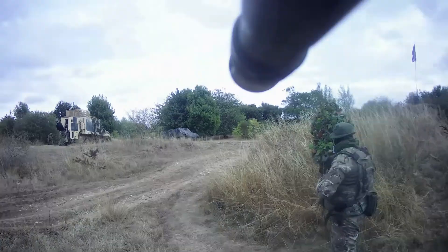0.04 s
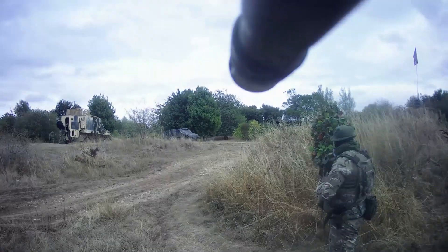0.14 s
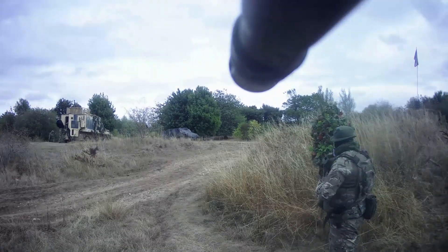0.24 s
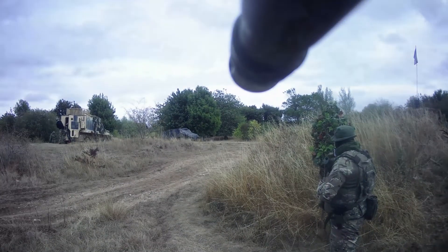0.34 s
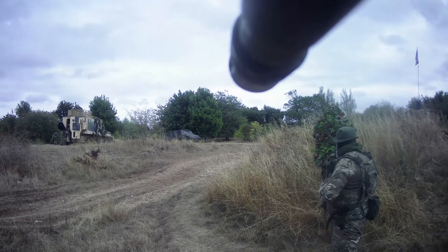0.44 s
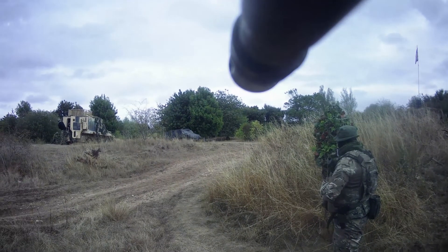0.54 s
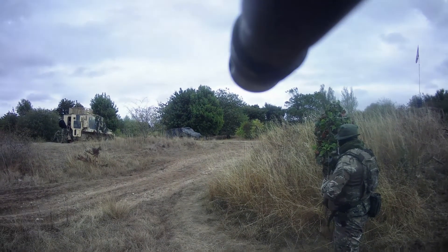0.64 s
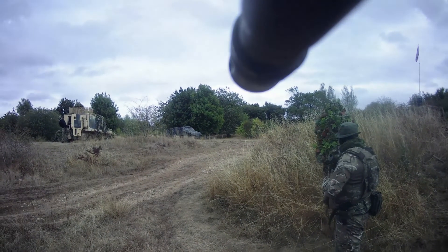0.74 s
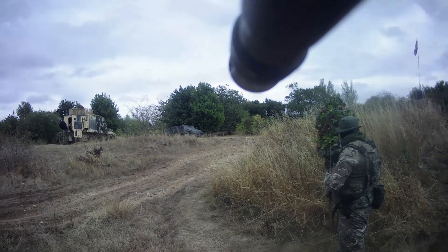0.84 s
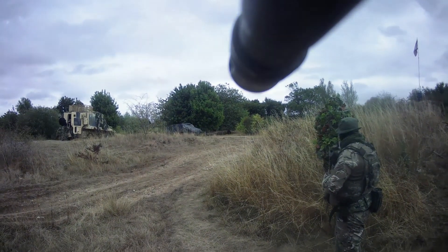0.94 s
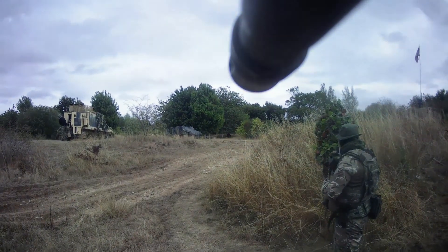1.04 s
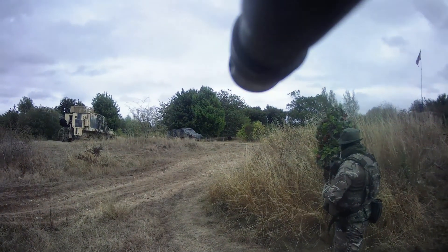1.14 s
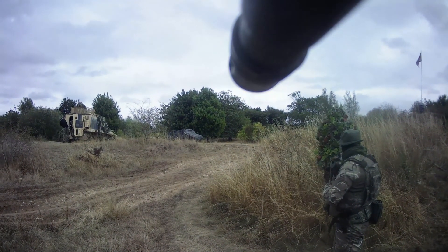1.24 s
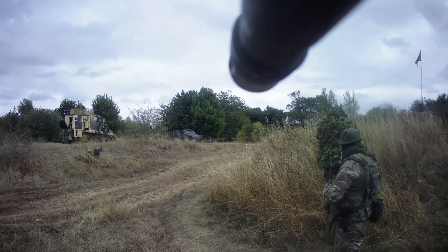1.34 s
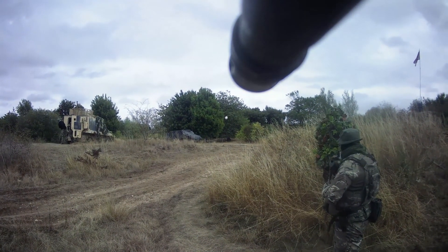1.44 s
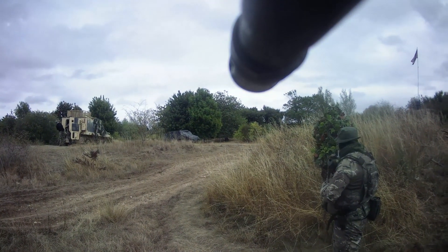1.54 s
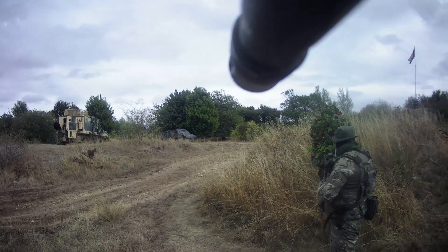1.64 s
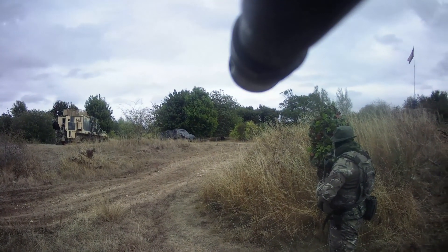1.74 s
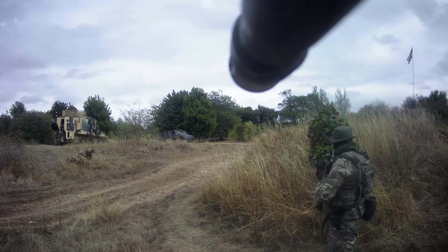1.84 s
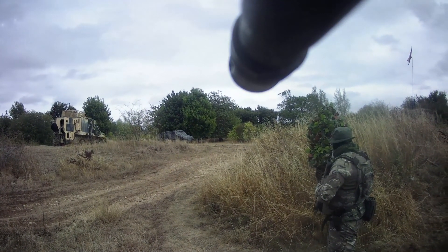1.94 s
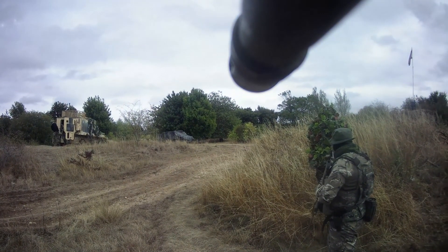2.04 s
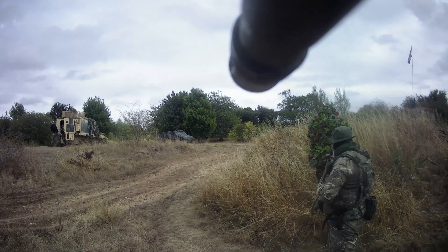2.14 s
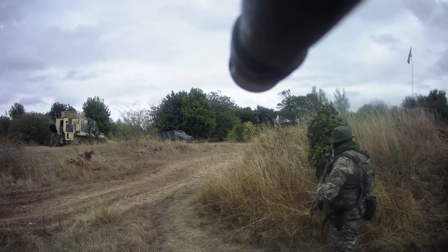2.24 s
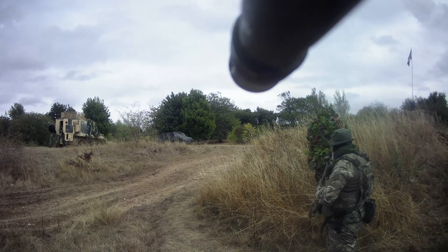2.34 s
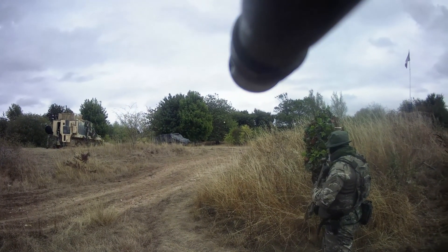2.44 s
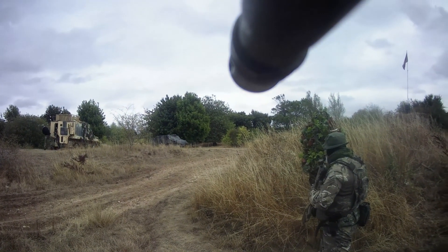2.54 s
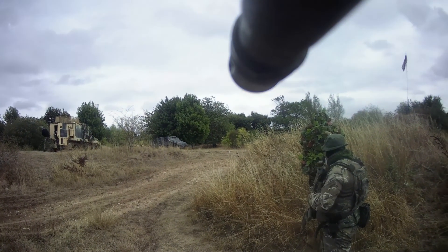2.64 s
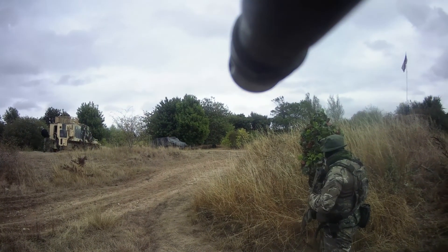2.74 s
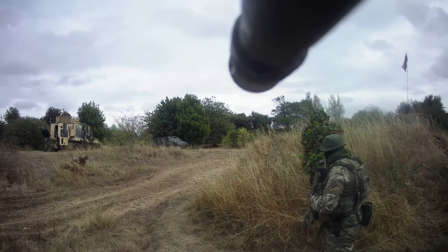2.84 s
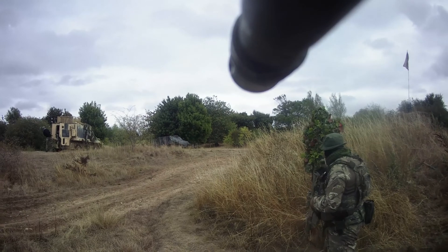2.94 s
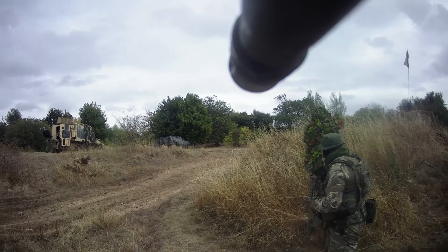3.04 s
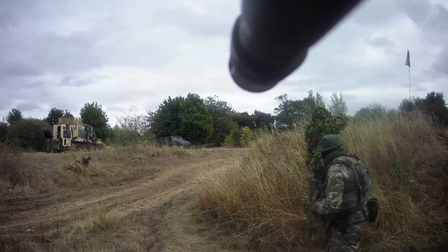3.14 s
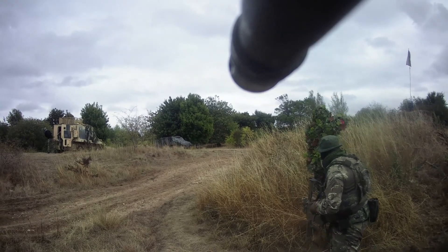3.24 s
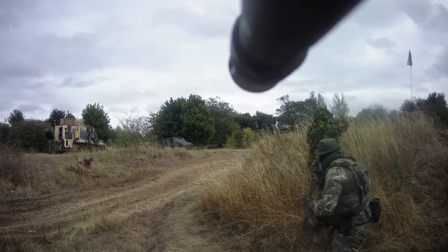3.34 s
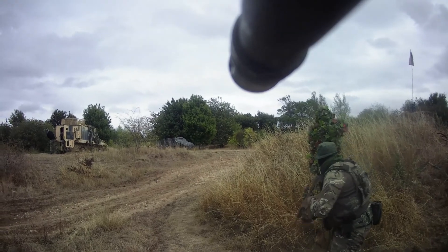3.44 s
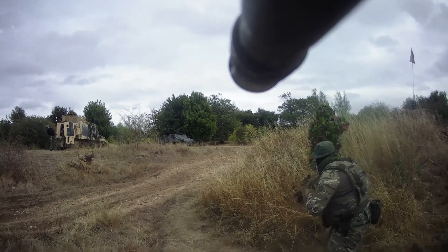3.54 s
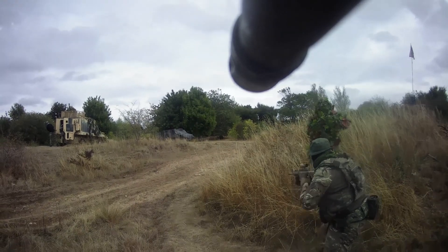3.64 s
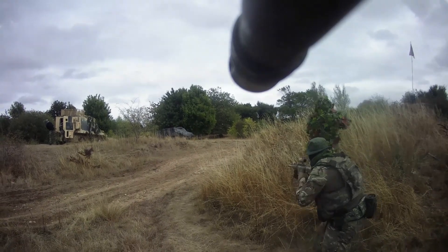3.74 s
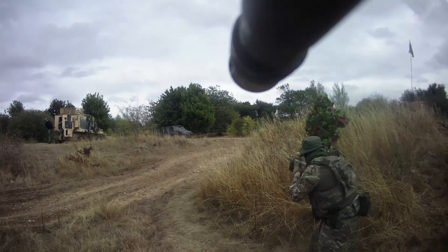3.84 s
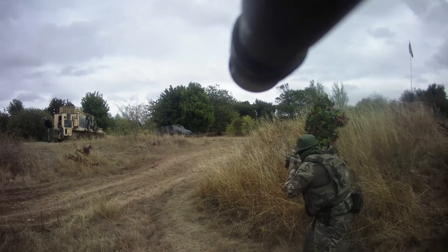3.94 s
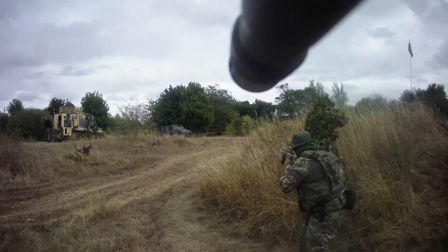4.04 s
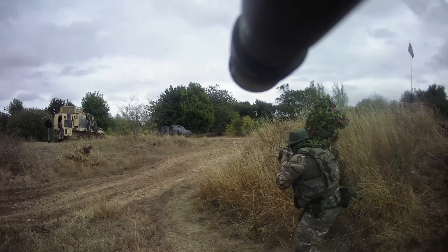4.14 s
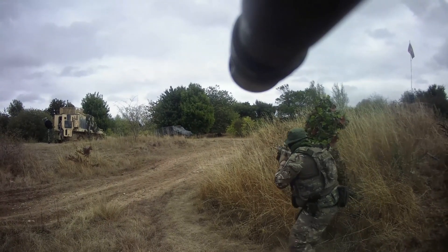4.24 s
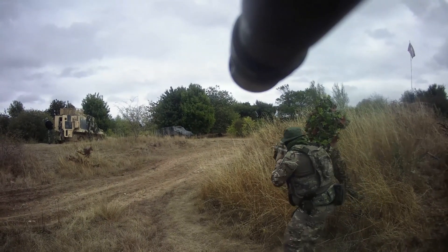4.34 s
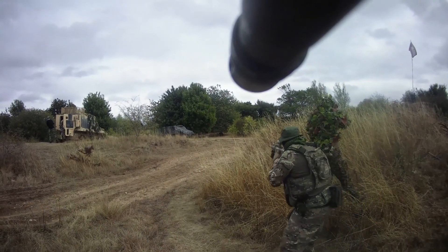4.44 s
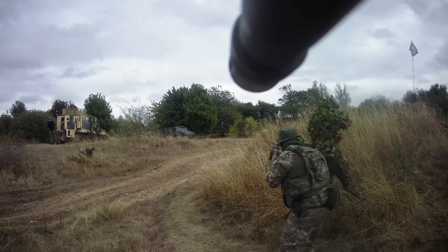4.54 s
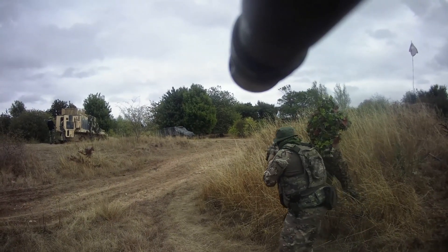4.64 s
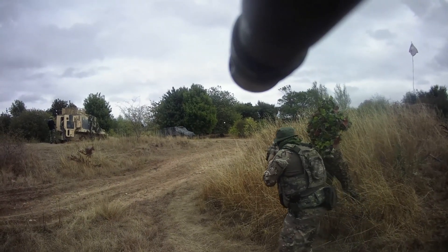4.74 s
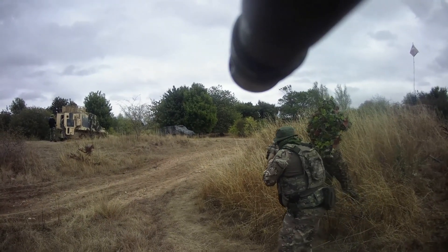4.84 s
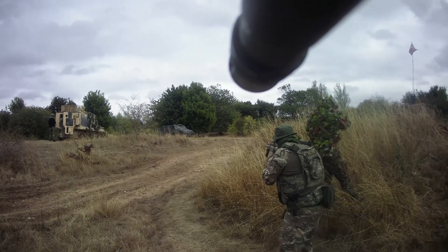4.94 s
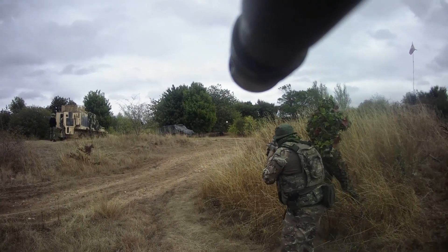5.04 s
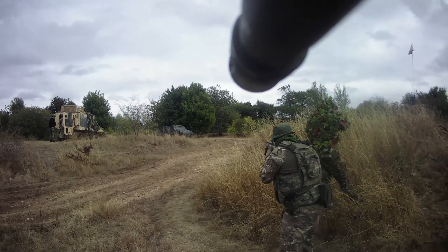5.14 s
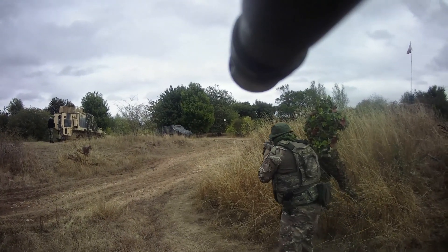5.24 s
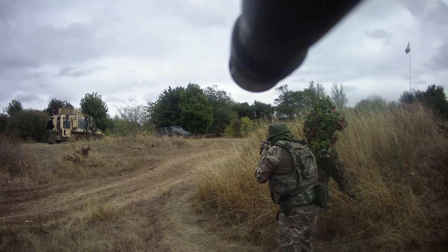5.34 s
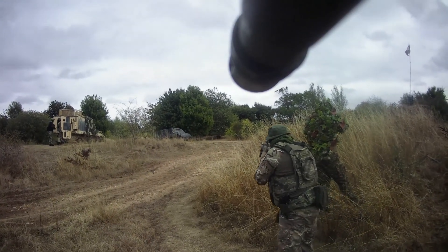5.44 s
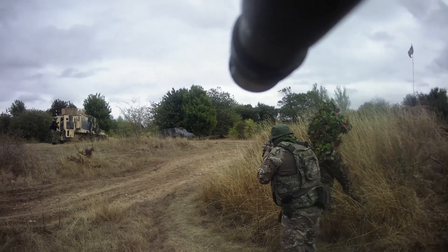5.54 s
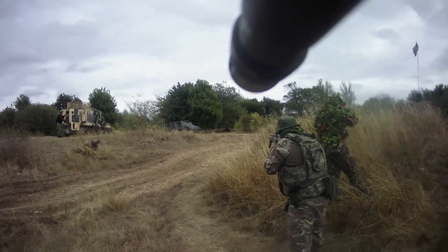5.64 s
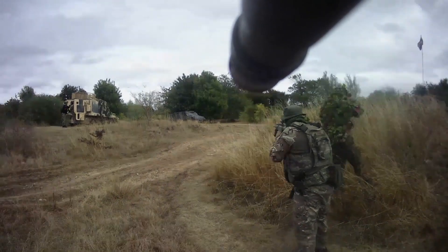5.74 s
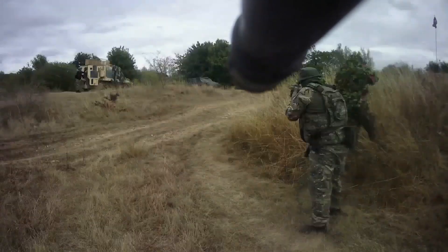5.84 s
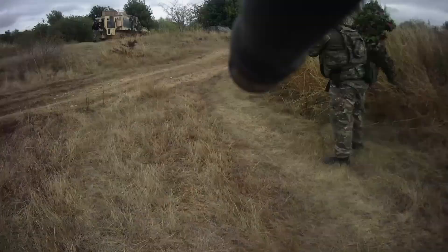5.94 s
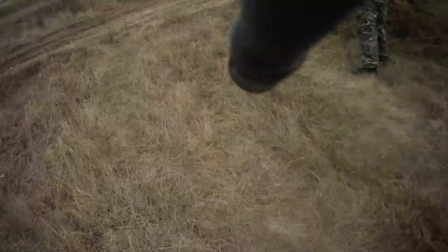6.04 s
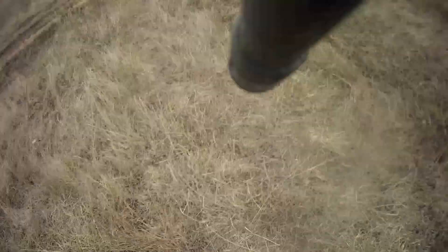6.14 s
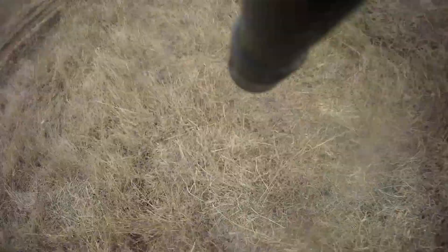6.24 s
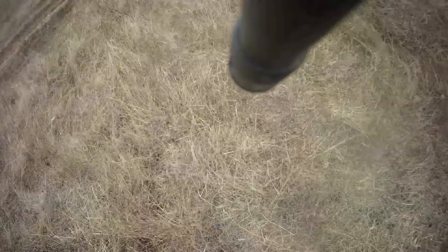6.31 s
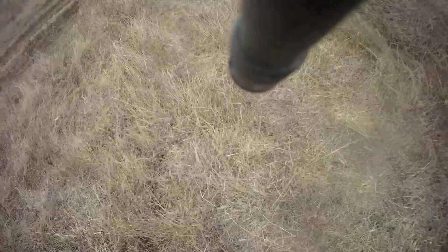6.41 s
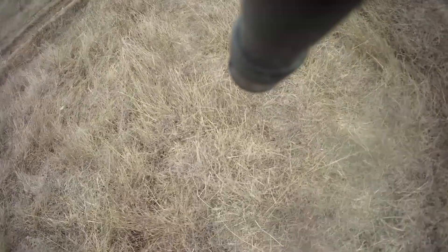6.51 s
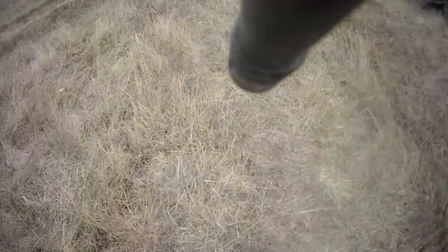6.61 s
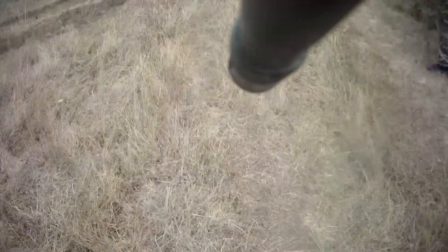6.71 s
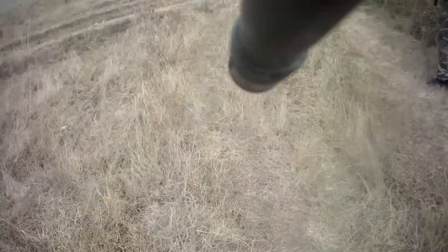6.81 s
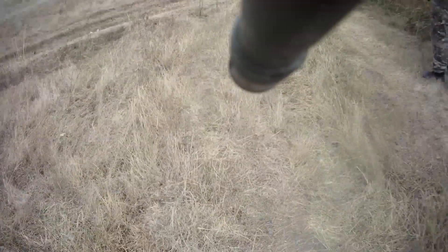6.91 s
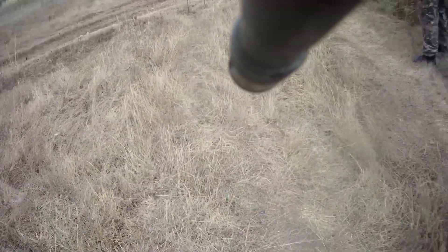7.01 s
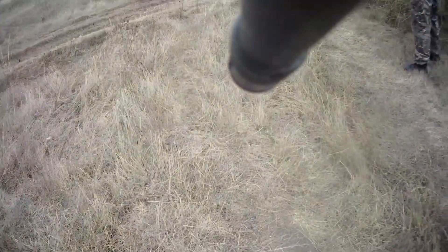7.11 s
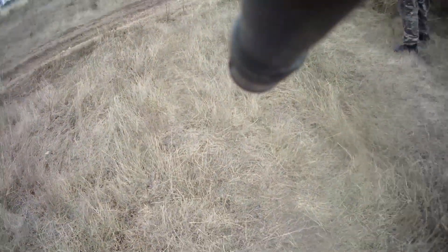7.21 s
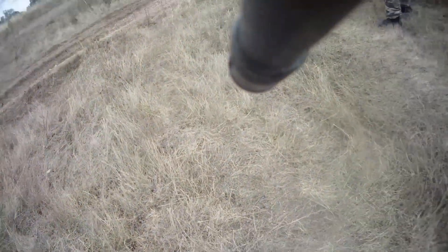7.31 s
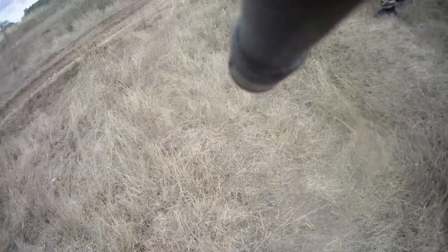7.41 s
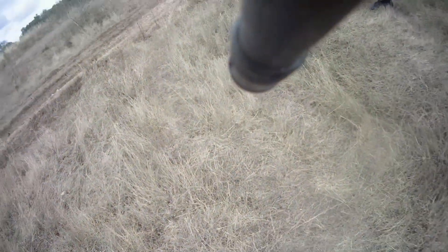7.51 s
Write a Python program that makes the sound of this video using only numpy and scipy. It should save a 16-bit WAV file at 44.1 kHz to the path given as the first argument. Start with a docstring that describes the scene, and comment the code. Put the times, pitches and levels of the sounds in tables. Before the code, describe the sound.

Close by in quiet open air, an airsoft gun's motor spins up and its piston hammers out a brief burst, two longer ones and a final one of over a second. The gears whir and wind down after each. Afterwards the gun is lowered with a single sharp clack, amid soft rhythmic cloth rustle, small ticks of kit and a little low wind on the microphone.

```python
"""An electric airsoft rifle fires four full-auto bursts close by, in an open field.
Its motor spins up, whines through a gearbox, sags each time it draws the spring and coasts down;
the piston slams home twelve times a second. Then the gun is lowered with one sharp clack, while kit
rustles and ticks in quick strokes and a little wind buffets the microphone. Most sounds follow the
source-filter principle: impacts or noise excite a fixed spectrum. All levels are relative."""
import sys
import numpy as np
from scipy import signal
from scipy.fft import rfft, irfft
from scipy.io import wavfile
from scipy.ndimage import uniform_filter1d

SR = 44100
rng = np.random.default_rng(int(sys.argv[2]) if len(sys.argv) > 2 else 0)


def file_out(sig):
    """Save sig as 16-bit WAV at sys.argv[1]."""
    # one column per channel
    cols = np.atleast_2d(sig).T
    # limit, then scale
    lim = np.clip(cols, -1, 1)
    pcm = np.round(lim * 32767).astype(np.int16)
    wavfile.write(sys.argv[1], SR, pcm)


N = 333837
TIME = np.arange(N) / SR
GRID_HZ = np.maximum(np.fft.rfftfreq(8192, 1 / SR), 1)

# trigger pulls: pulled t/s, first shot t/s, its level/dB, shot rate/Hz, released t/s,
# coasting time constant/s, gears slack t/s
BURSTS = [(1.399, 1.4925, -8, 12.07, 1.654, .064, 1.747), (2.048, 2.151, -7, 12.0, 2.762, .046, 2.817),
          (3.077, 3.160, -16.5, 11.89, 3.858, .046, 3.911),
          (4.425, 4.512, -16.5, 11.88, 5.592, .061, 5.708)]
# strokes of cloth, each with a tick in it: t/s, level/dB
STROKES = [(5.852, -50.5), (6.033, -51.5), (6.238, -49), (6.443, -51), (6.642, -52), (6.815, -51.5),
           (6.996, -55.5), (7.165, -56), (7.334, -54), (7.501, -54)]


def from_db(db):
    """Amplitude ratio of a level in decibels."""
    return 10 ** (np.asarray(db) / 20)


def colour(points):
    """Gain spectrum interpolated over log frequency from rows of f/Hz, level/dB."""
    hz, db = np.transpose(points)
    return from_db(np.interp(np.log(GRID_HZ), np.log(hz), db))


def through(x, gain):
    """Minimum-phase filter, made by folding the cepstrum; it conserves the power of white noise."""
    cepstrum = irfft(np.log(gain + 1e-9))
    half = len(cepstrum) // 2
    cepstrum[1:half] *= 2
    cepstrum[half + 1:] = 0
    response = irfft(np.exp(rfft(cepstrum)))
    return signal.oaconvolve(x, response / np.linalg.norm(response))[:N]


def drift(rate_hz):
    """Random modulation: linear interpolation between unit Gaussian values."""
    values = rng.standard_normal(N // 8)
    return np.interp(TIME * rate_hz, np.arange(len(values)), values)


def impacts(rows, chatter_s, chatter, rise_s=.0008):
    """Impact excitation: a click amid decaying contacts per row of t/s, level/dB (energy over 5 ms)."""
    out, age = np.zeros(N + SR), TIME[:SR // 10]
    for s, db in rows:
        burst = rng.standard_normal(len(age)) * np.exp(-age / chatter_s) * np.minimum(age / rise_s, 1)
        burst *= chatter / np.linalg.norm(burst)
        burst[int(rise_s * SR)] += 1
        at = int(np.clip(s * SR, 0, N))
        out[at:at + len(age)] += from_db(db) * burst / np.linalg.norm(burst) * np.sqrt(.005 * SR)
    return out[:N]


def ring(x, hz, t60):
    """Damped resonator: a unit impulse starts a decaying sine of amplitude 1."""
    r, w = np.exp(-np.log(1000) / (t60 * SR)), 2 * np.pi * hz / SR
    return signal.lfilter([0, np.sin(w)], [1, -2 * r * np.cos(w), r * r], x + 1e-18)


def settle(start, time_constant):
    """Exponential relaxation from 1, beginning at the start time."""
    return np.exp(-np.clip((TIME - start) / time_constant, 0, 20))


def wind():
    """Turbulent pressure on the microphone, rising as the wearer moves, over the hush of the field."""
    strength = [(0, -80), (.22, -79), (.34, -60), (.55, -78), (.8, -62.5), (1.08, -61.5), (1.3, -74),
                (1.92, -80.5), (2.9, -56.5), (4.06, -60), (4.4, -55.5), (5.8, -48), (6.15, -49),
                (6.35, -43), (7.05, -47.5), (7.57, -50.5)]  # wind envelope: t/s, level/dB
    wind_spectrum = [(25, -24.5), (60, -10), (100, 0), (150, 0), (200, 2), (260, -1.5), (330, -3),
                     (480, -7), (800, -17), (1500, -28.5), (4000, -55.5)]  # buffeting: f/Hz, level/dB
    field_spectrum = [(32, -35.5), (55, -4), (97, 2.5), (139, -4.5), (186, -3), (227, -5.5), (447, -9),
                      (573, -7), (671, 2), (768, -7.5), (1410, -8.5), (1980, -13), (3800, -26.5),
                      (9800, -30.5), (12000, -42.5), (15600, -72), (22000, -120)]  # steady background: f/Hz, level/dB
    s, db = np.transpose(strength)
    gusts = from_db(np.interp(TIME, s, db) + 2.7 * drift(30) - .5)
    buffeting = gusts * through(rng.standard_normal(N), colour(wind_spectrum))
    return buffeting + from_db(-65) * through(rng.standard_normal(N), colour(field_spectrum))


def plastic_taps():
    """Damped impacts on plastic; a loose part rocks periodically after the first burst."""
    taps = [(.036, -59), (.639, -55.5), (4.043, -55), (4.157, -58), (4.271, -61)]  # dull contacts: t/s, level/dB
    spectrum = [(300, -25), (1500, 1), (2300, -0.5), (3000, -5), (3600, -14.5), (8000, -30)]  # plastic: f/Hz, level/dB
    rocking = [(1.873 + k / 23, -57) for k in range(4)]
    return through(impacts(taps + rocking, chatter_s=.0034, chatter=2.4), colour(spectrum))


def whistle():
    """A faint pure tone whose phase is the integral of a slightly falling frequency."""
    glide = [(.05, 1430, -80), (.08, 1425, -60.5), (.16, 1420, -73), (.24, 1410, -70), (.28, 1400, -90)]  # course of the tone: t/s, f/Hz, level/dB
    s, hz, db = np.transpose(glide)
    phase = 2 * np.pi * np.cumsum(np.interp(TIME, s, hz)) / SR
    return np.sin(phase) * np.interp(TIME, s, from_db(db), left=0, right=0)


def kit_ticks():
    """Light impacts of sling and kit, each exciting three metal modes into free vibration."""
    clear = [(.143, -54, -62), (.343, -45.5, -57), (.351, -46, -75), (.514, -50.5, -84), (.786, -48.5, -53),
             (.852, -53.5, -60), (.875, -48, -59), (.997, -55, -70), (1.007, -52.5, -56), (1.34, -52, -62),
             (6.1375, -34, -76.5), (6.611, -37.5, -31), (7.348, -52, -48.5)]  # distinct ticks: t/s, tick level/dB, ping level/dB
    spectrum = [(100, -34.5), (400, -3), (680, 10.5), (1150, -1), (1450, 9.5), (2400, -5), (4000, -11.5),
                (6500, -18.5), (8000, -43), (12000, -29.5)]  # dry tick: f/Hz, level/dB
    faint_per_s, spread_db = 5.9, 2  # the kit never keeps quite still
    chance = rng.random((200, 3))
    faint_s = np.cumsum((.5 + chance[:, 0]) / faint_per_s)
    faint_db = [-61, -75] + spread_db * (2 * chance[:, 1:] - 1)
    faint = np.column_stack([faint_s, faint_db])[faint_s < TIME[-1]]
    rows = list(clear) + [(s, -40, -65) for s, _ in STROKES] + list(faint)
    contacts = impacts([row[:2] for row in rows], chatter_s=.0059, chatter=2.6, rise_s=.0013)
    kicks = np.zeros(N)
    for s, _, ping_db in rows:
        kicks[int(s * SR)] = from_db(ping_db)
    pings = .81 * ring(kicks, 3420, .043) + ring(kicks, 3470, .031) + .044 * ring(kicks, 5850, .03)
    return through(contacts, colour(spectrum)) + pings


def hollow_knocks():
    """Soft impacts sound hollow through one dominant resonance."""
    knocks = [(.545, -51), (.558, -49), (.903, -41), (.973, -51), (.982, -47), (6.529, -42), (6.543, -42),
              (6.556, -37.5), (6.965, -48)]  # contacts: t/s, level/dB
    spectrum = [(100, -11), (450, -15.5), (680, 9), (1000, -24), (1450, -11), (2500, -28), (8000, -48)]  # hollow response: f/Hz, level/dB
    return through(impacts(knocks, chatter_s=.0062, chatter=.73), colour(spectrum))


def motor():
    """Inertia: tooth rate/Hz and force lag as the motor labours through one draw, runs free and coasts."""
    first_draw_hz, run_hz, bite_hz = 1560, 2192, 282  # below the bite rate the gears fall quiet
    spin_up_s, freed_s, take_up_s = .032, .016, .02
    run_db, db_per_doubling, slack_db = -17, 5, -16
    speed, force = np.zeros(N), np.zeros(N)
    for pulled, first, _, _, released, coast_s, slack in BURSTS:
        labouring = first_draw_hz * (1 - settle(pulled, spin_up_s))
        freed = (run_hz - first_draw_hz) * (1 - settle(first, freed_s))
        hz = (labouring + freed) * settle(released, coast_s) + 1e-6
        db = run_db + db_per_doubling * np.log2(hz / run_hz) + slack_db * (1 - settle(slack, .006))
        bite = hz ** 2 / np.hypot(hz ** 2, bite_hz ** 2)
        speed += hz
        force += from_db(db) * (1 - settle(pulled, take_up_s)) * bite
    # swells as the half-drawn spring drives the gears back onto the latch: caught t/s, level/dB
    run_backs = [(1.795, -36.5), (2.846, -44), (3.967, -37)]
    for caught, db in run_backs:
        force += from_db(db) * np.exp(-np.abs(TIME - caught) / .013) * (TIME < caught)
    return speed, force


def spring_load(shot_times):
    """Periodic loading by the spring modulates tooth rate and the gains of grind, whine and overtones."""
    # one firing cycle: t/s after the shot, speed ratio, grind level/dB, whine level/dB, overtone level/dB
    cycle = [(0, 1, -3.5, 3, -8.5), (.012, 1.11, 3.5, 0.5, -8.5), (.022, 1.09, 2, 0.5, -2),
             (.043, 1.04, 1, 3.5, -4), (.053, .98, 1, -2.5, 7), (.063, .93, 0.5, -6, 8),
             (.069, .89, 1, 1, 1), (.074, .9, -0.5, 2, -16), (.086, 1, 0, 2.5, -1.5)]
    speed, force = motor()
    since_shot = np.abs(TIME - shot_times[np.searchsorted(shot_times, TIME) - 1])
    after, *columns = np.transpose(cycle)
    ratio, grind_db, whine_db, overtone_db = [np.interp(since_shot, after, c) for c in columns]
    # coasting gears rattle less and sing more clearly, with weaker overtones
    coasting = uniform_filter1d(np.clip(-np.gradient(speed) * SR / 15000, 0, 1), size=400)
    grind = force * from_db(grind_db - 2 * coasting)
    whine = force * from_db(whine_db + 2.5 * coasting)
    overtones = from_db(overtone_db - 3.1 * coasting)
    flutter = 1 + .009 * drift(400) + .014 * drift(25)
    return speed * ratio * flutter, grind, whine, overtones


def shell_colour():
    """Gain spectrum of gearbox and shell: overlapping resonances add in power."""
    modes = [(280, 220, -20), (639.4, 181, -1.5), (708, 220, -1), (943, 170, -3.5), (1351, 180, -1),
             (1616, 370, -3), (2038, 250, 1.5), (2343, 480, -6), (2876, 410, -8), (3343, 200, 0.5),
             (3522, 194, 2), (4182, 460, -12.5), (5106, 900, -27.5), (5856, 380, -18.5), (6650, 400, -22),
             (7440, 500, -29), (8570, 570, -37.5), (9990, 300, -35), (11250, 520, -43.5)]  # resonances: f/Hz, width/Hz, level/dB
    peaks = [from_db(db) / (1 + (2 * (GRID_HZ - hz) / width) ** 2) for hz, width, db in modes]
    return np.sqrt(sum(peak ** 2 for peak in peaks))


def gears(speed, teeth, grind, whine, overtones):
    """Meshing teeth force the shell to vibrate; eccentric pinion and bevel gear modulate the amplitude."""
    coupling = [(500, 2), (1000, 1.5), (1450, 0), (2000, -4.5), (2350, -3), (2900, -5), (3450, 4),
                (3900, -0.5), (4400, 0.5), (5200, -4), (7000, -2.5)]  # transfer from teeth to shell: f/Hz, level/dB
    pinion_turns, bevel_turns = teeth / 10, teeth / 30.5
    throb = (1 + .24 * np.sin(2 * np.pi * pinion_turns)) * (1 + .16 * np.sin(2 * np.pi * bevel_turns))
    # uneven teeth shake the whine in phase and strength; hard-pressed teeth add overtones
    phase = 2 * np.pi * teeth + .29 * drift(700)
    harmonics = from_db(-2) * np.sin(2 * phase) + from_db(-7) * np.sin(3 * phase)
    tone = whine * throb * (np.sin(phase) + overtones * harmonics) * from_db(2 * drift(130))
    whining = from_db(-11.5) * through(tone, shell_colour() * colour(coupling))
    # the slower spur gears knock once a tooth, never twice alike
    spur_contacts = np.diff(np.floor(teeth * .29 + .15 * drift(900)), prepend=0) > 0
    knocks = spur_contacts * rng.standard_normal(N) * np.sqrt(SR / (speed * .39 + 100))
    rattle = grind * throb * (from_db(-12) * knocks + from_db(-4) * rng.standard_normal(N))
    return through(rattle, shell_colour()) + whining


def shots():
    """Piston slams as rows of t/s, level/dB: after a starting transient the period is steady."""
    slam_db, spread_db = -15.5, 1.3
    overrun_s, stretch = .05, .28  # a cycle this near its end at the release still fires, a little late
    rows, cycle = [], np.arange(20)
    warm_up_lag = .012 * (1 - .2 ** cycle)
    for _, first, first_db, rate, released, _, _ in BURSTS:
        s = first + cycle / rate + warm_up_lag
        db = np.where(cycle == 0, first_db, slam_db + spread_db * rng.standard_normal(len(cycle)))
        late = stretch * np.maximum(s - released, 0)
        rows += list(np.transpose([s + late, db])[s < released + overrun_s])
    return np.array(rows)


def piston(slams, speed, teeth):
    """Stored spring energy is released: the piston slips, spits air, slams, and its rack is caught."""
    rack_spectrum = [(30, -49.5), (100, -10), (250, 3.5), (450, 2.5), (700, 3), (1100, -13), (1400, 8.5),
                     (3000, -2), (8000, -59)]  # sector gear on the rack: f/Hz, level/dB
    slam_spectrum = [(40, -41.5), (100, -10), (170, -14.5), (270, -3.5), (430, -8.5), (900, 4),
                     (1170, -3.5), (1580, 4), (2500, -3.5), (3500, -21.5), (4600, -14.5), (6500, -26.5),
                     (12000, -51)]  # piston impact: f/Hz, level/dB
    puff_spectrum = [(1000, -16.5), (3000, -5.5), (4000, 14.5), (5200, -23.5), (6900, 7), (8000, -18.5),
                     (10000, -7), (12000, -25)]  # air leaving the barrel: f/Hz, level/dB
    pickup_teeth = 44  # pass between a slam and the next catch
    s, db = np.transpose(slams)
    slips = impacts([(t - .008, -28) for t in s], chatter_s=.0027, chatter=2.1)
    hits = from_db(1.5) * impacts(slams, chatter_s=.005, chatter=3.9, rise_s=.0013)
    puffs = impacts(zip(s - .004, .15 * db - 28.5), chatter_s=.0068, chatter=8, rise_s=.0012)
    firing = through(slips, colour(rack_spectrum)) + through(hits, colour(slam_spectrum))
    air = through(puffs, colour(puff_spectrum))
    catch_teeth = np.interp(s, TIME, teeth) + pickup_teeth
    caught = TIME[np.minimum(np.searchsorted(teeth, catch_teeth), N - 1)]
    catches = impacts([(t, -21) for t in caught], chatter_s=.004, chatter=1, rise_s=.001)
    # the first rack teeth pass in a short rising chirp
    age = np.abs(TIME - caught[np.searchsorted(caught, TIME) - 1])
    chirp_hz = np.interp(age, [0, .011], [560, 860])
    envelope = np.interp(age, [0, .003, .009, .014], [.049, .96, .98, .0033])
    chirp = envelope * np.sin(2 * np.pi * np.cumsum(chirp_hz) / SR)
    pickup = through(catches, colour(rack_spectrum)) + from_db(-20) * chirp
    return firing + air + pickup * speed / 2300  # a coasting motor catches more gently


def lingering_tones(gun):
    """Resonant decay: a faint high metallic ring lingers; the field's low background tone swells a bit."""
    metallic_ring = from_db(-93) * ring(gun, 3526, t60=.66)
    background_tone = from_db(-78.5) * ring(gun, 668, t60=.65)
    return metallic_ring + background_tone


def bushes(gun):
    """Diffuse scattering from bushes: convolution with decaying noise gives a faint, dull tail."""
    response = rng.standard_normal(SR) * np.exp(-TIME[:SR] / .11)
    scattered = signal.oaconvolve(gun, response / np.linalg.norm(response))[:N]
    return from_db(-46) * through(scattered, colour([(300, 6), (1500, -12.5), (6000, -30)]))


def latch():
    """Backlash: gears take up slack or fall back on the latch, exciting the shell's resonances."""
    hits = [(1.795, -25.5), (1.819, -35), (2.846, -27.5), (3.016, -57.5), (3.102, -26), (3.967, -21),
            (3.993, -32), (4.007, -37), (4.501, -18)]  # gear impacts: t/s, level/dB
    contacts = impacts(hits, chatter_s=.0057, chatter=6.5, rise_s=.003)
    return through(contacts, shell_colour() * colour([(700, 2.5), (2000, -9), (7000, -19.5)]))


def cloth():
    """Friction noise of fibres swells with each stroke, peaking just after its tick."""
    spectrum = [(200, 5.5), (700, 2), (1500, 3), (2800, -9.5), (4500, -13), (6500, -32), (8000, -34.5),
                (12000, -42)]  # rustle: f/Hz, level/dB
    lag_s, width_s = .008, .036
    swells = sum(from_db(db) / (1 + ((TIME - s - lag_s) / width_s) ** 2) ** 1.1 for s, db in STROKES)
    fibres = rng.standard_normal(N) * from_db(5.5 * drift(300) - 1.2)
    return through(swells * fibres, colour(spectrum))


def clack():
    """Temporal fusion: impacts milliseconds apart are heard as one clack as the gun is lowered."""
    hits = [(6.2375, -22.5), (6.2435, -22.5), (6.2485, -16), (6.253, -24), (6.262, -28), (6.27, -31)]  # contacts: t/s, level/dB
    spectrum = [(60, -32), (150, -10), (245, -3), (380, -9), (760, 1.5), (1000, -3.5), (1300, -12.5),
                (1700, -3.5), (2000, -14.5), (3500, -23.5), (5000, -33.5), (7000, -41), (9000, -38),
                (12000, -50)]  # response of the gun: f/Hz, level/dB
    return through(impacts(hits, chatter_s=.0048, chatter=3.6, rise_s=.0012), colour(spectrum))


def scene():
    """Superposition of gun, handling and open air in one channel."""
    slams = shots()
    speed, grind, whine, overtones = spring_load(slams[:, 0])
    teeth = np.cumsum(speed) / SR
    gun = latch() + gears(speed, teeth, grind, whine, overtones) + piston(slams, speed, teeth)
    tail = lingering_tones(gun) + bushes(gun)
    handling = plastic_taps() + kit_ticks() + hollow_knocks() + cloth() + clack()
    return (gun + tail + handling + wind() + whistle())[None]


def record(dry):
    """Soft saturation rounds the loudest peaks; a steep low-pass limits the bandwidth."""
    ceiling, cutoff_hz = .9, 11700
    rounded = dry / (1 + (dry / ceiling) ** 4) ** .25
    return signal.sosfilt(signal.ellip(10, .1, 80, cutoff_hz, fs=SR, output="sos"), rounded)


dry = scene()
out = record(dry)
file_out(out)
```